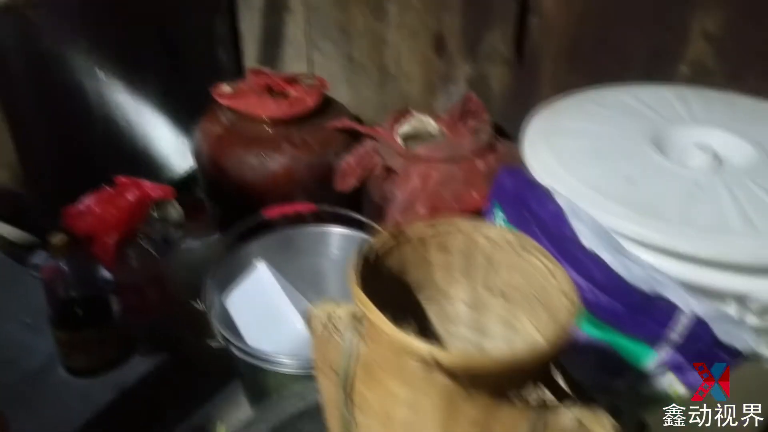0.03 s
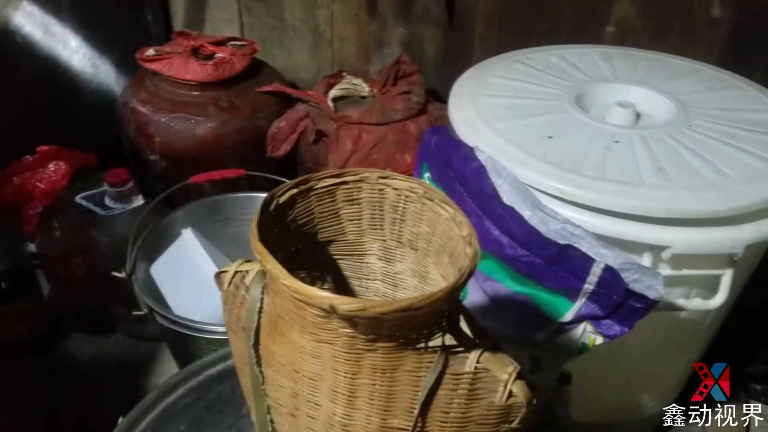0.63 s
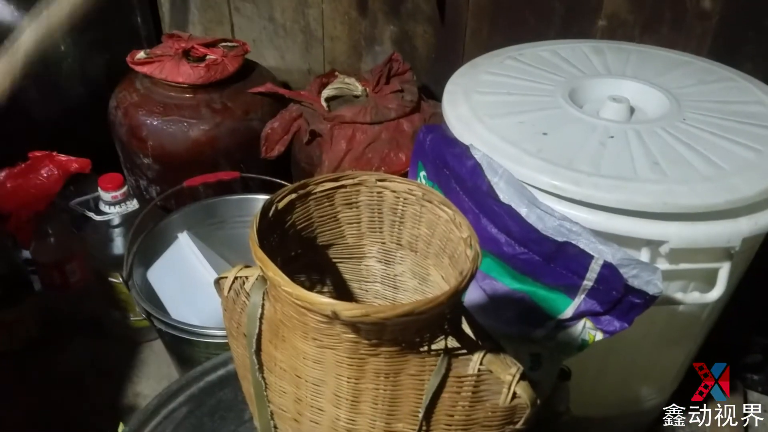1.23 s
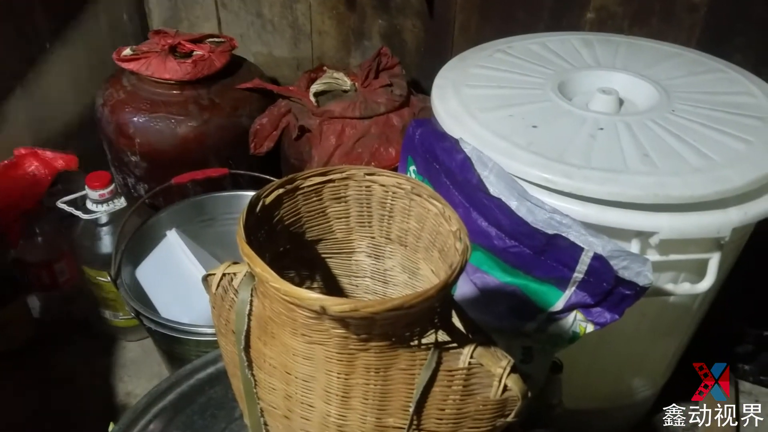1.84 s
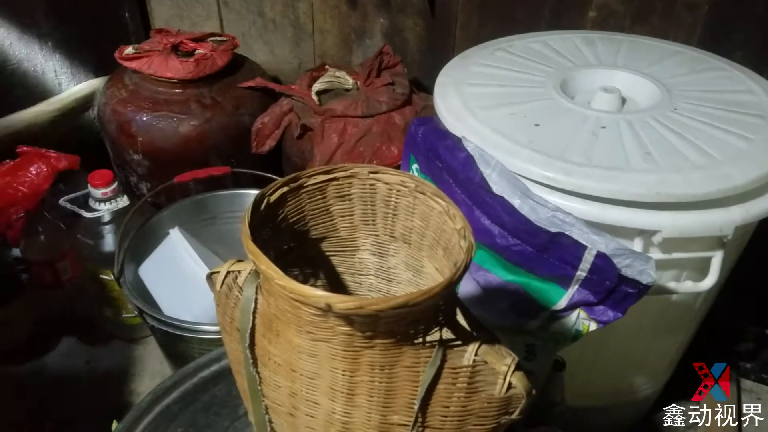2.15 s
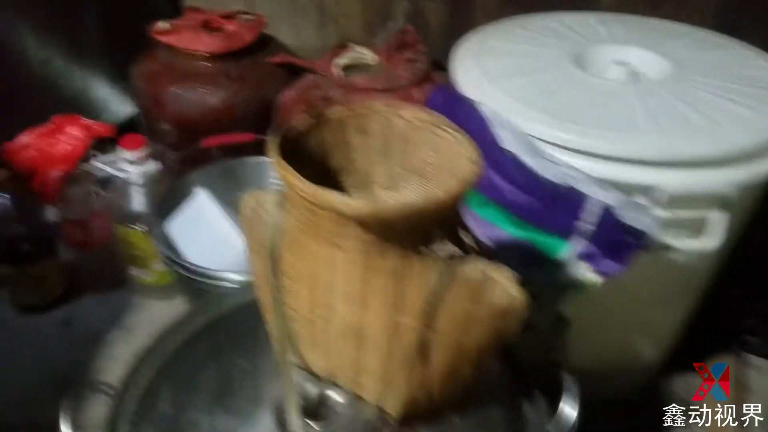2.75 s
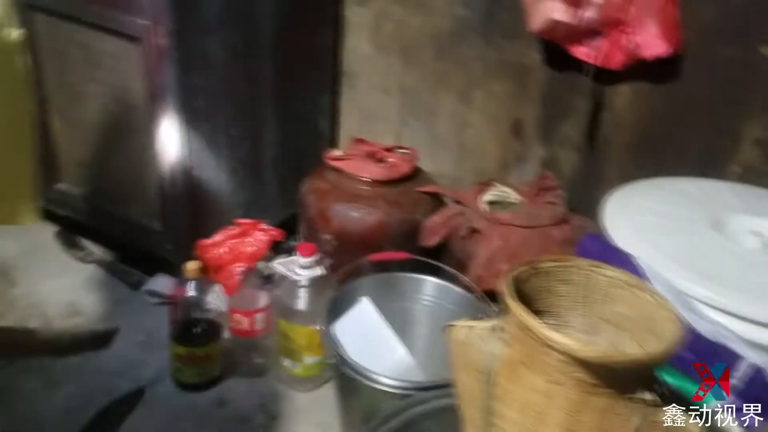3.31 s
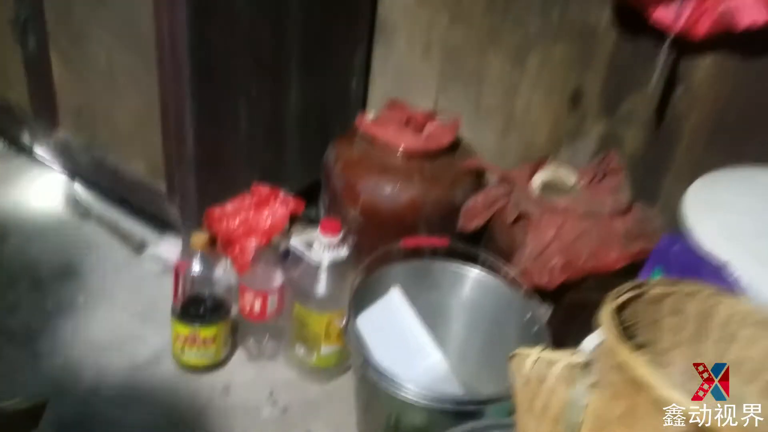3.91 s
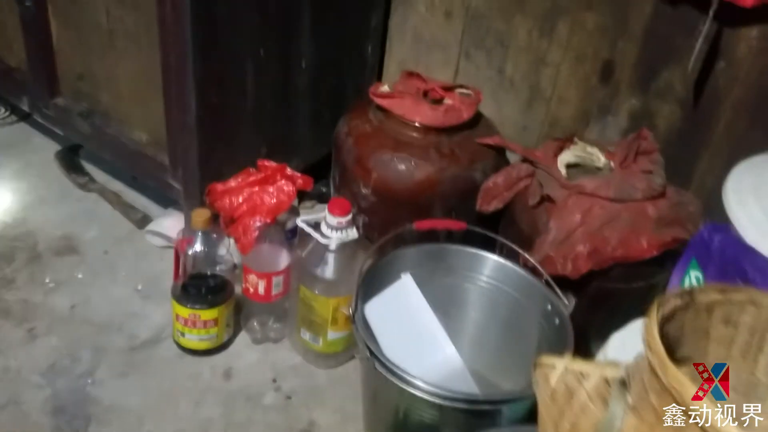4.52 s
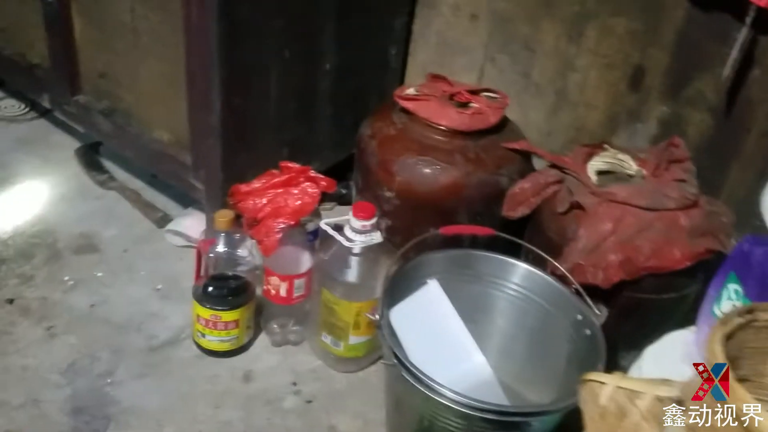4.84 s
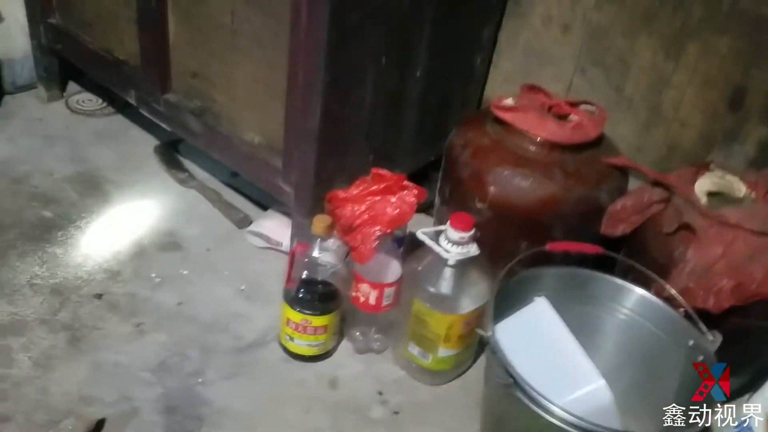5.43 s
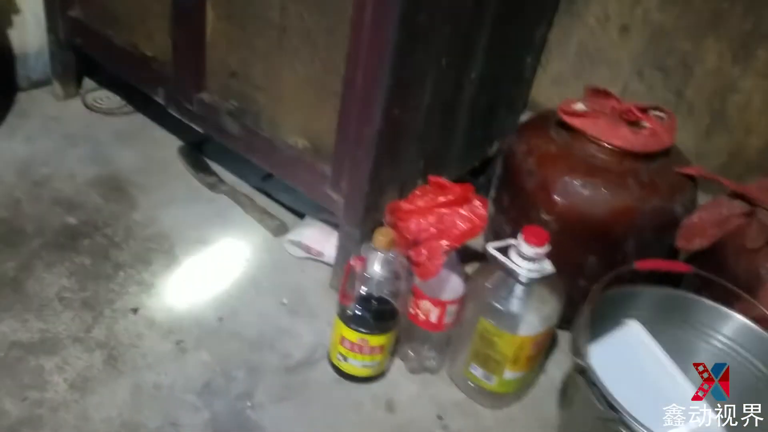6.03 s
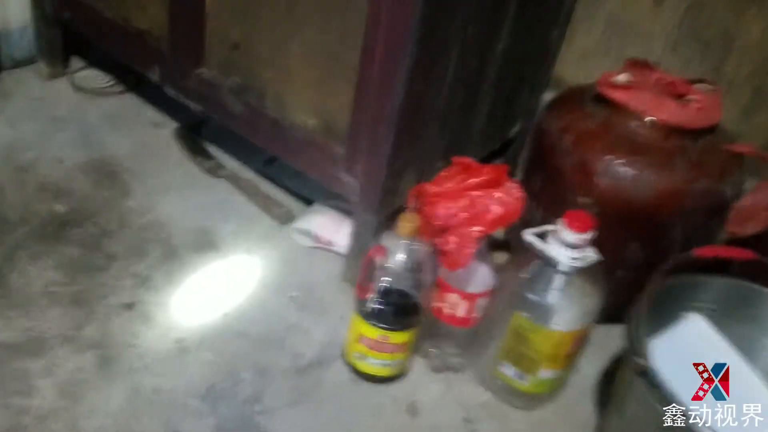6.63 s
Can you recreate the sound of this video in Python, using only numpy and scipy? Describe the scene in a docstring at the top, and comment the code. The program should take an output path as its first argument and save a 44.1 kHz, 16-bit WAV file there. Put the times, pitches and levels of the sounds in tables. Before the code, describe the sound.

A sudden loud wooden bang and hollow booms, then knocks, gritty scrapes and wicker rustles as things are shifted in a small room.

```python
"""A small, hard-walled storeroom, where baskets and containers are shifted on the concrete floor.
A wooden board bangs and clatters, a hollow tub booms, a steel pail rings faintly; then come knocks on
crates and pots, gritty scrapes and wicker rustles. Blows wake each object's modes, and knocks and
scrapes ring through the room to a hand-held phone with two unlike microphone ports.
Behind them lie quiet air, soft low bumps, a thin high whine and a few faint chirps."""
import sys
import numpy as np
from scipy import signal
from scipy.fft import rfft, irfft, next_fast_len
from scipy.io import wavfile

SR = 44100
rng = np.random.default_rng(int(sys.argv[2]) if len(sys.argv) > 2 else 0)


def transcribe(u):
    """Save the signal u as a 16-bit wav file named by the first command-line argument.

    u: samples, shape (n,) or (channels, n), limited to [-1, 1]; the rate is SR.
    q: integer samples, one column per channel.
    """
    v = np.clip(np.atleast_2d(u).T, -1, 1)
    q = np.round(v * 32767).astype(np.int16)
    wavfile.write(sys.argv[1], SR, q)


N = 294147
TAIL = 40000  # samples over which one contact rings out
T = np.arange(TAIL) / SR
NOW = np.arange(N) / SR
TOP_HZ = 14800

# the room's reverb: band_hz, t60_s, port_likeness (0 to 1)
REVERB = [(58.7, 0.41, 0.31), (243, 0.47, 0.93), (491, 0.54, 0.5), (940, 0.54, 0.3), (1970, 0.47, 0),
          (5030, 0.42, 0), (13880, 0.29, 0)]
# colour of the room tone: frequency_hz, level_db
AIR_TONE = [(30, 1), (132, 2), (404, -2), (1200, -9), (1750, -7), (2800, -11), (5400, -16.5), (6400, -12.5),
            (7430, -23.5), (13900, -17), (15000, -40.5)]
# level of the room tone, higher while things are moved: time_s, level_db
AIR_SWELL = [(0, -65), (0.899, -66.5), (1.9, -69), (2.4, -57), (3.5, -53.5), (5.2, -62), (6.67, -61.5)]
# two pairs of chirps: peak_s
CHIRP_TIMES = [.96, 1.015, 1.225, 1.28]
# soft low bumps: peak_s, half_width_s, level_db
LOW_BUMPS = [(0.127, 0.075, -59.5), (1.36, 0.12, -62)]

# colour of sliding wicker and of hard surfaces, before size and hardness shape it: frequency_hz, level_db
WICKER_TONE = [(125, 16), (350, 8), (1100, -3.5), (2100, 5.5), (3100, -2), (4800, -3), (7000, -4.5),
               (11000, 7.5)]
HARD_TONE = [(125, 9.5), (350, 7.5), (1000, -1), (2200, 0), (3100, -6), (4800, -9), (7000, -11),
             (11000, -1)]
# slides and rustles: peak_s, strength_db, low_hz, high_hz, rise_s, fall_s, hollow_db
SCRAPE_CUES = [ (.224, -54, 696, 3640, 0.011, 0.023, -6), (0.33, -43, 466, 1330, 0.018, 0.031, 5.5),
               (.675, -68.5, 1510, 7150, 0.019, 0.024, -17), (1.0, -64.5, 1300, 2100, 0.04, 0.05, 6),
               (1.235, -73.5, 1750, 1950, 0.04, 0.049, 12), (2.820, -36, 560, 690, 0.03, 0.075, -5.5),
               (2.991, -39.5, 412, 2000, 0.0092, 0.14, 8), (4.001, -50.5, 302, 5057, 0.12, 0.1, 1),
               (4.494, -43, 1520, 2700, 0.013, 0.009, 2), (4.882, -48, 612, 2460, 0.042, 0.0091, -4),
               (5.722, -51, 242, 6840, 0.035, 0.0026, -10), (6.161, -49, 1332, 1370, 0.071, 0.061, 6.5),
               (6.375, -51.5, 1210, 2250, 0.012, 0.011, -3), (6.425, -47.5, 905, 3860, 0.0069, 0.04, -7),
               (6.637, -47, 900, 1050, 0.017, .056, -3)]
# hard contacts; big things reach low, hard ones reach high, padded ones lose their treble steeply:
# start_s, strength_db, low_hz, high_hz, fall_db_per_octave, chatter_decay_s, chatter_db,
# direct_db, hollow_db
KNOCK_CUES = [ (0.056, -55.5, 500, 1000, 20, 0.014, 4, -6, -3),
              (0.141, -62, 2200, 4200, 11, .005, 8, -12, 1),
              (0.326, -42.5, 1100, 2340, 4.5, 0.0019, 2, -12.5, 7.5),
              (1.537, -63.5, 1200, 5000, 6.5, .002, -14, -11, -2),
              (2.1845, -39, 4180, 5000, 1, 0.0015, 0, 0, 15),
              (2.188, -25.5, 130, 1500, 6.5, 0.0073, 3, -5.5, 0),
              (2.197, -13, 101, 2260, 10, 0.14, 7.5, -1.5, 0.5),
              (2.237, -23.5, 300, 2010, 25, 0.097, 18, 6, -6),
              (2.363, -32.5, 1210, 2410, 13.5, 0.0073, 6, -4, 3),
              (2.376, -43, 4800, 5800, 14, 0.002, -3, 3, 10), (2.587, -27, 300, 480, 8.5, 0.017, 18, -3, 2),
              (2.640, -35, 199.6, 363, 21, 0.0084, 13, 1, 11.5),
              (2.6706, -24.5, 480, 2900, 13, 0.004, -7, -4, 0),
              (3.0268, -25.5, 640, 1800, 12, 0.0012, -2, -3.5, 1),
              (3.159, -33.5, 229, 350, 6.5, 0.14, 16, 7, 0), (3.186, -46, 1800, 2700, 22, 0.002, -4, 4, 4),
              (3.238, -41, 502, 2330, 7, 0.0056, 9, -8, 9.5),
              (3.329, -41, 1110, 1403, 11, 0.06, 4, -4, 6.5),
              (3.440, -54, 4500, 6400, 15, 0.0027, 1, -8, 11), (3.5, -45, 654, 2600, 5, 0.058, 3, -9, -5.5),
              (3.555, -48, 715, 1410, 7.5, 0.015, 2, -7, 0),
              (3.6617, -34.5, 1240, 3290, 14.5, 0.0033, 11, -19, 1),
              (3.751, -29.5, 263, 2320, 15.5, 0.017, 14, 1.5, -5.5),
              (3.776, -31, 234, 3250, 27.5, 0.019, -4, -9, -2),
              (4.171, -41, 327, 2050, 9.5, 0.044, -1, -11, -6),
              (4.2596, -39, 420, 3200, 11, 0.0017, -17, -4.5, -5),
              (4.6455, -44, 533, 4160, 6, 0.022, 0, -9, 7),
              (4.6846, -20, 644, 1320, 11.5, 0.0019, -37.5, -8, 2),
              (5.598, -55.5, 1100, 1510, 7.5, .006, 1, -8, 6),
              (5.628, -48, 1200, 1510, 18, 0.0022, -3, -9.5, 5.5),
              (5.669, -36, 606, 1840, 11, 0.014, 3, -16, 4), (5.8, -52.5, 960, 970, 6, 0.00094, -6, 4, 17),
              (5.839, -51, 990, 1280, 8, 0.0025, -9, -4.5, 0),
              (6.148, -56, 1170, 1256, 16, 0.0032, -20, -2, 15.5),
              (6.516, -36.5, 520, 2310, 9, 0.014, 2, -4.5, 0.5),
              (6.575, -34.5, 680, 7050, 12.5, 0.0039, 16, -8, -5.5)]

# the modes each object rings with: pitch_hz, level_db, t60_s
BOARD_MODES = [(273.5, 3, 0.4), (367, 11, 0.2), (441, 8, 0.28), (503, 1, 0.74), (646, -3.5, 0.33),
               (717, -10.5, 0.31), (905, -12.5, 0.9), (1017, -9.5, 0.7), (1233, -5.5, 0.6),
               (1457, 5.5, 0.2), (1563, -1.5, 0.81), (1630, -3.5, 0.5), (2034, -3, 0.36)]
CRATE_MODES = [(131, 7.5, 0.5), (227, 4.5, 0.55), (455, -2, 0.62), (1525, -1.5, 0.47), (1665, 11, 0.15),
               (1864, 1, 0.088), (2085, 10, 0.099)]
TUB_MODES = [(48, -6, 0.48), (83.8, -5.5, 0.51), (112, 14, 0.11), (121, -6, 0.55), (331.2, -9, 0.41),
             (395, 0.5, 0.11)]
PAIL_MODES = [(3740, 8.8, 1)]
JAR_MODES = [(517, -2, 0.46), (1620, -8, 0.19)]
POT_MODES = [(960, 1, 0.42), (980, -0.34, 0.16), (1610, -1.8, 0.19)]
# the hits that set them ringing: start_s, strength_db
BOARD_HITS = [(2.198, -24)]
CRATE_HITS = [(3.159, -55), (3.753, -36.5)]
TUB_HITS = [(2.194, -15.5), (2.588, -18.5), (2.642, -22), (2.725, -36)]
PAIL_HITS = [(2.54, -54)]
JAR_HITS = [(4.172, -40.5)]
POT_HITS = [(5.676, -39), (5.8, -57)]

# response of the phone's ports, with a dip near 190 Hz that the room adds: frequency_hz, gain_db,
# left_minus_right_db
PORT_EQ = [(25, -31.5, -3), (55.4, -13, -1.5), (125, -2.5, -0.5), (190, -6.5, 0), (280, -8.5, -1),
           (537, -9, -1), (851, -7, -1), (1860, -6, -7), (3240, -5, -4), (5300, 0, -7.5), (8130, 0, 0),
           (9550, -11, 1), (14000, -6.5, 1)]


def amp(db):
    """Decibels to gain."""
    return 10 ** (np.asarray(db) / 20)


def unit(x):
    """Scale each channel to an energy of one."""
    return x / np.sqrt(np.sum(x ** 2, axis=-1, keepdims=True))


def along(hz, points_hz, values):
    """Read a curve on a log-frequency axis."""
    return np.interp(np.log(np.maximum(hz, 1)), np.log(points_hz), values)


def eq(x, points_hz, db, size=4096):
    """Minimum-phase equaliser drawn through the given points."""
    cepstrum = irfft(along(np.fft.rfftfreq(size, 1 / SR), points_hz, db) * np.log(10) / 20)
    cepstrum[1:size // 2] *= 2
    cepstrum[size // 2 + 1:] = 0
    response = irfft(np.exp(rfft(cepstrum)))
    return signal.fftconvolve(x, response[None], axes=1)[:, :x.shape[1]]


def low_cut(x, hz):
    """Roll off the bass at 12 dB per octave."""
    return signal.sosfilt(signal.butter(2, hz, "high", fs=SR, output="sos"), x)


def add(out, start_s, x):
    """Mix x into out from start_s on."""
    start = max(int(start_s * SR), 0)
    out[:, start:start + x.shape[1]] += x[:, :max(N - start, 0)]


def diffuse_field(bands=15):
    """Sound arriving from all sides, in roughly half-octave bands: a list of (t60_s, stereo noise)."""
    room_hz, t60_s, likeness = np.transpose(REVERB)
    size = next_fast_len(N + TAIL)
    hz = np.fft.rfftfreq(size, 1 / SR)
    edges = np.r_[0, np.geomspace(150, SR / 2, bands)]
    alike = along(hz, room_hz, likeness)
    mid, side = rfft(rng.standard_normal((2, size)))
    stereo = mid * np.sqrt((1 + alike) / 2) + side * np.sqrt((1 - alike) / 2) * np.array([[1], [-1]])
    return [(along((lo + hi) / 2, room_hz, t60_s), irfft(stereo * (hz >= lo) * (hz < hi), size))
            for lo, hi in zip(edges, edges[1:])]


def room_air(field, whine_hz=6560, whine_width_hz=110, whine_db=-81.5, waver_db=1.5, waver_points=110):
    """A bed of quiet air, with a thin high whine wavering in it."""
    noise = sum(band for _, band in field)[:, ::-1][:, :N]  # reversed, so it is unlike the reverb
    swell = amp(np.interp(NOW, *np.transpose(AIR_SWELL)))
    hush = unit(eq(noise, *np.transpose(AIR_TONE))) * swell
    whine = unit(signal.lfilter(*signal.iirpeak(whine_hz, whine_hz / whine_width_hz, SR), noise))
    waver = np.interp(NOW, np.linspace(0, N / SR, waver_points), rng.standard_normal(waver_points))
    return np.sqrt(N) * (hush + amp(whine_db + waver_db * waver) * whine)


def chirps(field, pitch_hz=6180, width_hz=90, half_width_s=0.022, level_db=-75):
    """Faint pulses of narrow, diffuse noise, like a distant cricket."""
    pulses = sum(np.exp(-((NOW - peak_s) / half_width_s) ** 2) for peak_s in CHIRP_TIMES)
    noise = sum(band for _, band in field)[:, :N]
    whistle = unit(signal.lfilter(*signal.iirpeak(pitch_hz, pitch_hz / width_hz, SR), noise))
    return amp(level_db) * pulses * np.sqrt(N) * whistle


def bumps(band_hz=(35, 110)):
    """Brief swells of low rumble."""
    rumble = signal.sosfilt(signal.butter(2, band_hz, "band", fs=SR, output="sos"), rng.standard_normal(N))
    swells = sum(amp(db) * np.exp(-((NOW - peak_s) / half_s) ** 2) for peak_s, half_s, db in LOW_BUMPS)
    return np.sqrt(N) * unit(rumble) * swells


def grains(per_s, spread_db):
    """Tiny slips at random moments, a few much larger than the rest."""
    sizes = amp(spread_db * np.minimum(rng.exponential(size=TAIL), np.pi))
    return (rng.random(TAIL) < per_s / SR) * rng.choice([-1, 1], TAIL) * sizes


def contact_tone(surface, strength_db, low_hz, high_hz, hollow_db, fall_db_per_octave=9):
    """EQ curve of a contact: size limits the bass, hardness the treble, and midway it rings hollow."""
    hz = np.geomspace(30, TOP_HZ, 60)
    centre_hz = np.sqrt(low_hz * high_hz)
    high_slope = fall_db_per_octave / (10 * np.log10(2))
    loss_db = lambda f: 10 * np.log10((1 + (low_hz / f) ** 4) * (1 + (f / high_hz) ** high_slope))
    hollow = hollow_db * np.exp(-(np.log2(hz / centre_hz) / 0.28) ** 2)  # 0.28 octave to each side
    surface_db = along(hz, *np.transpose(surface))
    return hz, strength_db + surface_db - loss_db(hz) + loss_db(centre_hz) + hollow


def radiate(force, field, start_s, direct_db, tone, build_s=0.0012, soft_hz=6000, port_lag_s=0.00025):
    """A contact reaches the phone straight, off the floor and from the walls, coloured by its tone."""
    start = max(int(start_s * SR), 0)
    # every slip feeds the room, whose energy builds quickly and drains at its own rate in each band
    fill = np.exp(-1 / (build_s * SR))
    feed = signal.lfilter([1 - fill], [1, -fill], force ** 2 + 1e-18)
    heard = np.zeros((2, TAIL))
    for t60_s, band in field:
        retained = np.exp(-2 * np.log(1000) / (t60_s * SR))
        energy = signal.lfilter([1], [1, -retained], feed)
        heard += band[:, start:start + TAIL] * np.sqrt(energy)
    # each spot that is touched has its own crowd of small, quickly damped resonances
    crowd_hz = np.geomspace(400, TOP_HZ, 170)
    crowd_db = 2.5 * np.r_[0, rng.standard_normal(len(crowd_hz) - 1)]
    heard = unit(eq(heard, crowd_hz, crowd_db))
    # yielding surfaces round off the straight pulse; the floor repeats it 4 to 7 ms later
    straight = amp(direct_db) * unit(signal.lfilter(*signal.butter(1, soft_hz, fs=SR), force))
    floor_bounce = amp(-7) * np.roll(straight, int(rng.uniform(.004, .007) * SR))
    early = straight + floor_bounce
    # the left port gets it first but faces away from it
    heard[0] -= amp(-5) * early
    heard[1] -= np.roll(early, int(port_lag_s * SR))
    return eq(np.sqrt(SR) * unit(heard), *tone)


def scrapes(field, direct_db=-5):
    """Wicker and grit catch and slip in a swarm that swells and dies away."""
    out = np.zeros((2, N))
    for peak_s, strength_db, low_hz, high_hz, rise_s, fall_s, hollow_db in SCRAPE_CUES:
        lead_s = min(np.pi * rise_s, peak_s)
        start_s = peak_s - lead_s
        pressure = np.exp(np.minimum((T - lead_s) / rise_s, (lead_s - T) / fall_s))
        force = grains(per_s=1500, spread_db=4.5) * pressure
        tone = contact_tone(WICKER_TONE, strength_db, low_hz, high_hz, hollow_db)
        add(out, start_s, radiate(force, field, start_s, direct_db, tone))
    return out


def ringing(modes, hits, attack_s=0.00022, detune=0.0049, wide_hz=900):
    """Each hit wakes the object's modes; the higher ones reach the two ports out of step."""
    out = np.zeros((2, N))
    for start_s, strength_db in hits:
        ring = np.zeros((2, TAIL))
        for pitch_hz, level_db, t60_s in modes:
            mistune, skew = rng.standard_normal(2)
            phase = skew * min(pitch_hz / wide_hz, 1) * np.array([[1], [-1]])
            decay = amp(level_db) * np.exp(-np.log(1000) * T / t60_s)
            ring += decay * np.sin(2 * np.pi * pitch_hz * (1 + detune * mistune) * T + phase)
        add(out, start_s, amp(strength_db) * ring * (1 - np.exp(-T / attack_s)))
    return out


def vessels():
    """The tub's boom and the pail's ring bloom over milliseconds; jar and pot speak at once."""
    tub = ringing(TUB_MODES, TUB_HITS, attack_s=0.0082)
    pail = ringing(PAIL_MODES, PAIL_HITS, attack_s=0.0062)
    return tub + pail + ringing(JAR_MODES, JAR_HITS) + ringing(POT_MODES, POT_HITS)


def wood():
    """The struck board and crate ring; boards and slats radiate little deep bass."""
    return low_cut(ringing(BOARD_MODES, BOARD_HITS) + ringing(CRATE_MODES, CRATE_HITS), hz=96)


def knocks(field):
    """Each knock is one sharp blow, then loose parts chatter to rest."""
    out = np.zeros((2, N))
    for cue in KNOCK_CUES:
        start_s, strength_db, low_hz, high_hz, treble_fall, decay_s, chatter_db, direct_db, hollow_db = cue
        chatter = grains(per_s=2500, spread_db=7.0) * np.exp(-T / max(decay_s, 0.001))
        force = amp(chatter_db) * unit(chatter)
        force[0] += 1  # the blow itself
        tone = contact_tone(HARD_TONE, strength_db, low_hz, high_hz, hollow_db, treble_fall)
        add(out, start_s, radiate(force, field, start_s, direct_db, tone))
    return out


def scene():
    """The mix: knocks and scrapes through the ports' EQ, ringing objects, and the quiet bed behind."""
    field = diffuse_field()
    port_hz, gain_db, _ = np.transpose(PORT_EQ)
    contacts = eq(knocks(field) + scrapes(field), port_hz, gain_db)
    return contacts + wood() + vessels() + bumps() + chirps(field) + room_air(field)


def record(dry):
    """The phone leans right in the mids, drops deep rumble, rounds the highest peaks and cuts the top."""
    port_hz, _, balance_db = np.transpose(PORT_EQ)
    left = eq(dry[:1], port_hz, balance_db / 2)
    right = eq(dry[1:], port_hz, -balance_db / 2)
    ports = low_cut(np.vstack([left, right]), hz=37)
    rounded = ports / (1 + ports ** 4) ** (1 / 4)
    return signal.sosfilt(signal.ellip(8, .2, 70, TOP_HZ, fs=SR, output="sos"), rounded)


dry = scene()
out = record(dry)
transcribe(out)
```